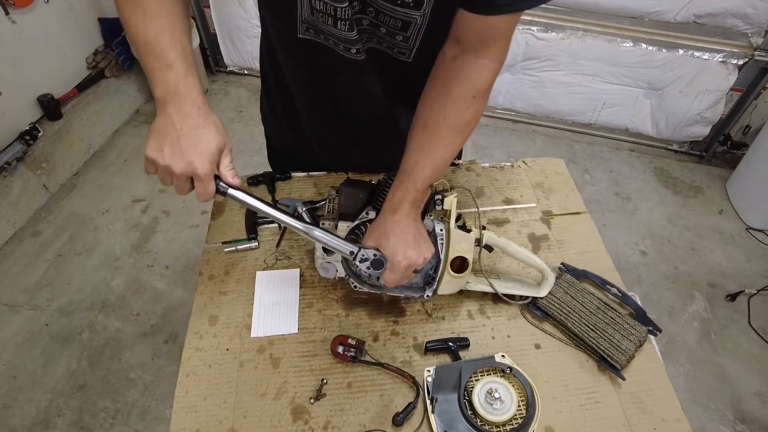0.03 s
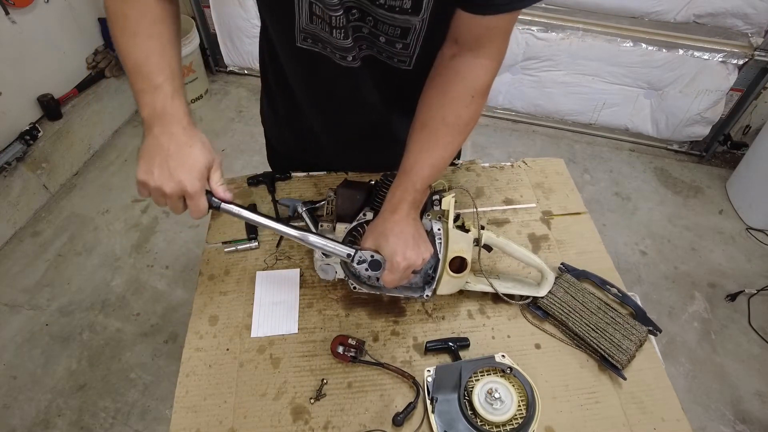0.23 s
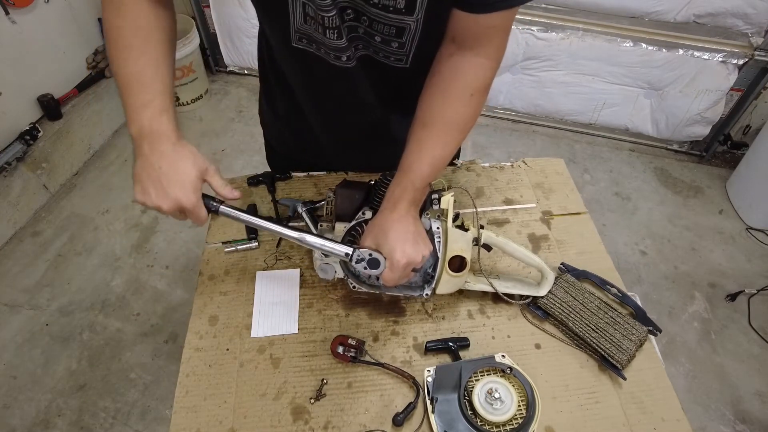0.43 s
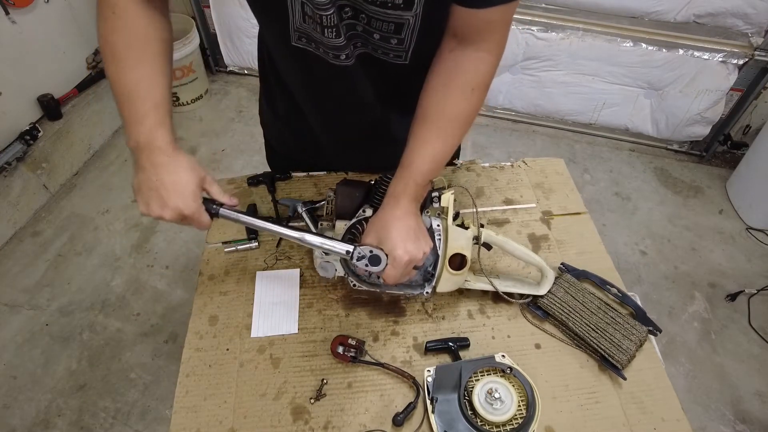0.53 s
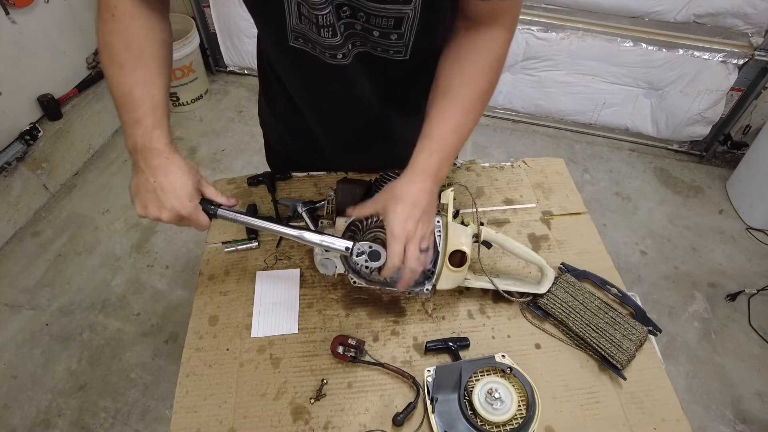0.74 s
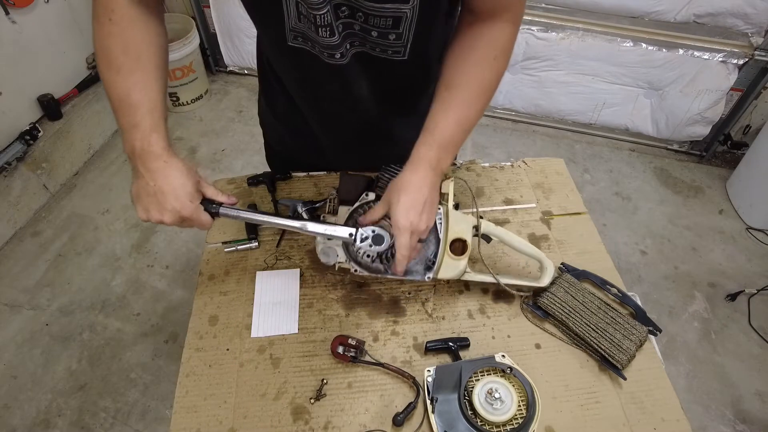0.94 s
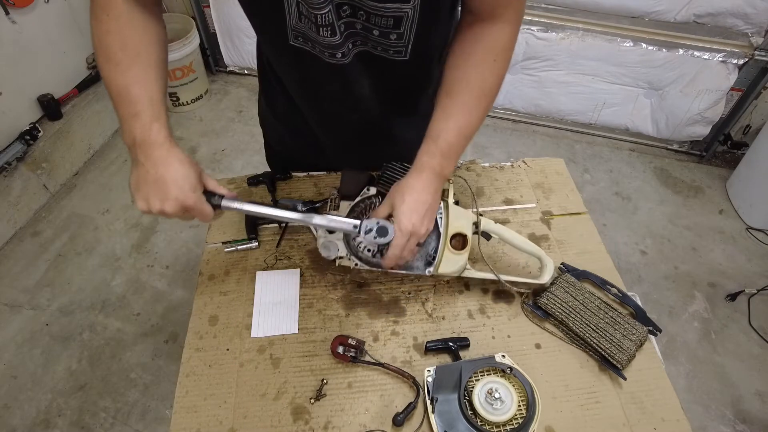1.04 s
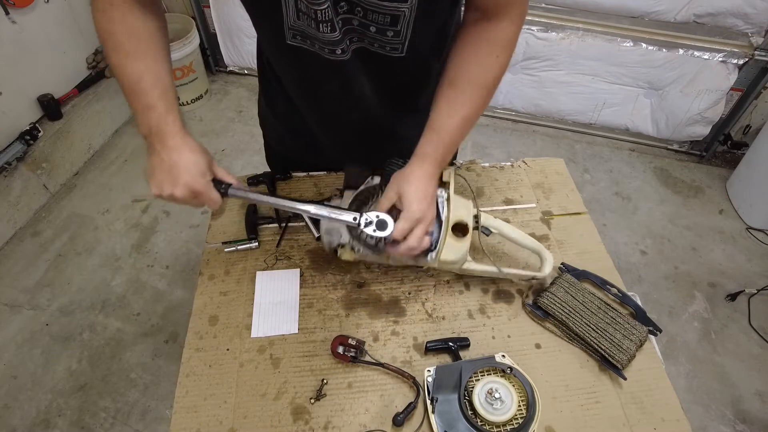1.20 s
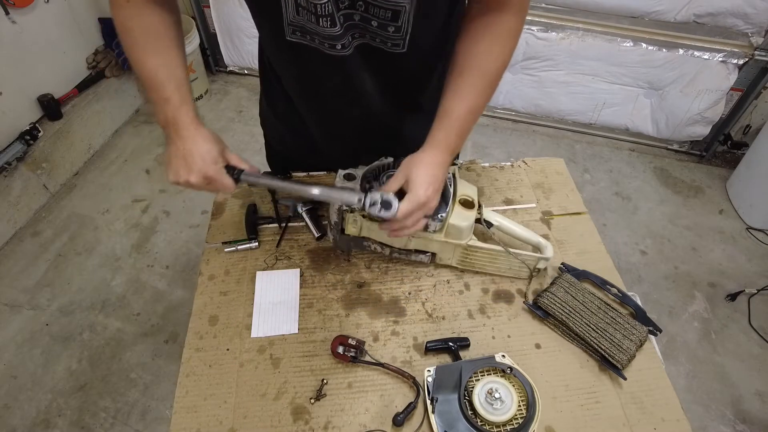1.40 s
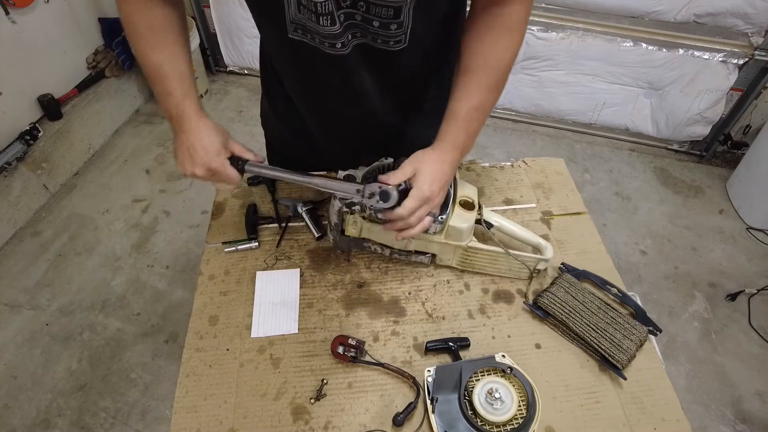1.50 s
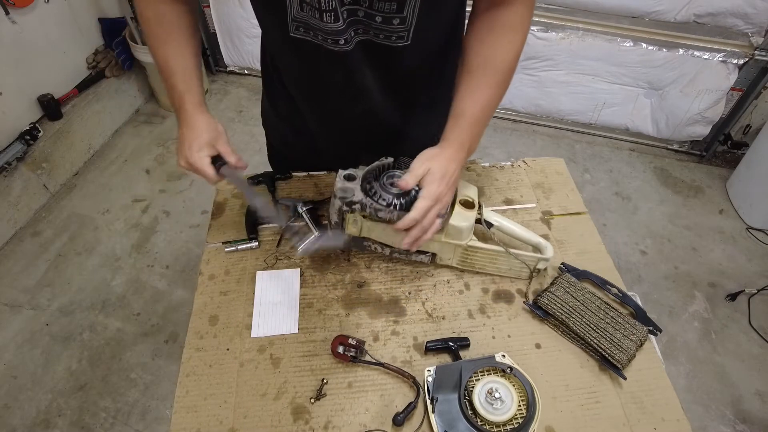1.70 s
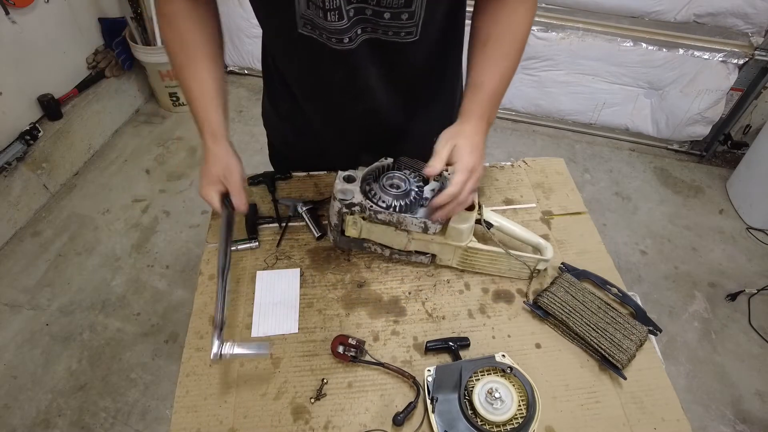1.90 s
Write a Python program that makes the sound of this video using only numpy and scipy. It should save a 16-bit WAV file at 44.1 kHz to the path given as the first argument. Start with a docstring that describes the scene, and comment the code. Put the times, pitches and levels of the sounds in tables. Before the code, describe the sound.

A torque wrench snaps once, sharp and metallic, on a chainsaw's nut. Faint ratchet ticks, hand bumps and a socket clink follow, then the saw's housing knocks down hard. The garage adds a short, bright echo over low hum.

```python
"""At a garage workbench, a click-type torque wrench breaks over on a chainsaw's clutch nut.
The impact excites the damped modes of the wrench's tube and jolts the engine. Hands squeak, bump and
rub, the ratchet clicks and the socket clinks as it is worked off the nut; then the saw's housing
knocks down sharply. Each struck body rings at its natural frequencies, and a short, bright
reverberation follows, over low rumble and hum."""
import sys
import numpy as np
from scipy import signal
from scipy.fft import rfft, irfft, next_fast_len
from scipy.io import wavfile
from scipy.ndimage import uniform_filter1d

SR = 44100
rng = np.random.default_rng(int(sys.argv[2]) if len(sys.argv) > 2 else 0)


def put_to_file(sound):
    """Save the sound as 16-bit audio at rate SR, in the file named by the first command-line argument."""
    columns = np.atleast_2d(sound).T  # one column per channel
    safe = np.clip(columns, -1, 1)
    whole_steps = np.round(safe * 32767)
    wavfile.write(sys.argv[1], SR, whole_steps.astype(np.int16))


N = 85995
TIME_S = np.arange(N) / SR


def amp(db):
    """Amplitude ratio of a level in decibels."""
    return 10 ** (np.asarray(db) / 20)


def unit_rms(x):
    """Normalisation to an rms of 1."""
    return x / np.sqrt(np.mean(x ** 2))


def decay(t60_s):
    """Exponential damping: 60 dB down after t60_s."""
    return np.exp(-np.log(1000) * TIME_S / t60_s)


def along(curve, hz):
    """Interpolation of (frequency, value) points on a logarithmic frequency axis."""
    knots_hz, values = np.array(curve).T
    return np.interp(np.log(np.maximum(hz, 1)), np.log(knots_hz), values)


def colour(x, spectrum):
    """Minimum-phase filtering: folding the cepstrum makes the given response causal."""
    size = 2 * next_fast_len(N)
    hz = np.arange(size // 2 + 1) * SR / size
    cepstrum = irfft(np.log(amp(along(spectrum, hz))))
    cepstrum[1:size // 2] *= 2
    cepstrum[size // 2 + 1:] = 0
    return irfft(rfft(x, size) * np.exp(rfft(cepstrum)))[..., :N]


def transpose(table, ratio):
    """Transposition: all frequencies scale by one ratio."""
    return [(hz * ratio, *rest) for hz, *rest in table]


def place(x, pan_db, lag_s=2.5e-5):
    """Level and time differences locate a source: the left channel is louder and earlier."""
    hz = np.arange(N + 1) * SR / (2 * N)
    late = irfft(rfft(x, 2 * N) * np.exp(-2j * np.pi * hz * lag_s))[:N]
    return np.array([x * amp(pan_db / 2), late * amp(-pan_db / 2)])


def contact_force(start_s, level_db, contact_ms=0.02):
    """A Gaussian force pulse: the longer the contact, the narrower the bandwidth and the duller the blow."""
    ms = (np.arange(N) - round(start_s * SR)) * 1000 / SR
    force = np.exp(-np.minimum((2 * ms / contact_ms) ** 2, 60))
    return amp(level_db) * force / force.sum()


# Contact noise spectrum: frequency_hz, gain_db
CRACK_SPECTRUM = [(300, -11.5), (1300, -2.5), (2300, -7), (4900, -3.5), (6100, -7.5), (8000, -14),
                  (12000, -13.5), (16000, -22)]

def strike(blows, modes, crack_db, crack_t60_s, low_hz, rise_s):
    """Modal superposition: each blow excites modes and noise; small bodies radiate little below low_hz."""
    ringing = sum(amp(db) * decay(t60_s) * np.sin(2 * np.pi * hz * TIME_S) for hz, db, t60_s in modes)
    onset = 1 - np.exp(-TIME_S / rise_s)
    sound = 0
    for blow in blows:
        crack = amp(crack_db) * colour(rng.standard_normal(N) * decay(crack_t60_s), CRACK_SPECTRUM)
        sound += signal.fftconvolve(contact_force(*blow), (ringing + crack) * onset)[:N]
    return signal.sosfilt(signal.butter(2, low_hz, "high", fs=SR, output="sos"), sound)


# Rumble spectrum: frequency_hz, gain_db
RUMBLE_SPECTRUM = [(30, 0), (55, -9.5), (110, -12.5), (200, -11.5), (320, -22), (700, -33.5), (1500, -39.5),
                   (2500, -45), (6000, -48.5), (9000, -56), (16000, -59)]
# Steady hum tones: pitch_hz, level_db
HUM_TONES = [(31.5, -61), (95.5, -61.5), (120, -67.5), (167, -68), (189, -62), (247, -75.5)]
# Hiss spectrum: frequency_hz, gain_db
HISS_SPECTRUM = [(300, -20.5), (1200, 2.5), (2500, -5), (4500, 1), (8000, -7), (16000, -29.5)]

def background():
    """Ambient rumble and hum, coherent between the ears in the bass; a faint hiss and steel ring decay."""
    rumble, side = amp(-51) * unit_rms(colour(rng.standard_normal((2, N)), RUMBLE_SPECTRUM))
    side = colour(side, [(60, -21), (180, -10), (500, -1.5), (4000, -4)])
    hum = sum(np.sqrt(2) * amp(db) * np.sin(2 * np.pi * (hz * TIME_S + rng.random()))
              for hz, db in HUM_TONES)
    hiss = amp(-61.5) * decay(t60_s=0.92) * unit_rms(colour(rng.standard_normal((2, N)), HISS_SPECTRUM))
    steel = amp(-69.5) * decay(t60_s=1) * np.sin(2 * np.pi * 6285 * TIME_S)
    return place(rumble + hum + steel, pan_db=1.9) + np.array([side, -side]) + hiss


# The pivot slips, then hits the tube wall: start_s, level_db, pitch_ratio
WRENCH_SNAPS = [(0.2061, -0.5, 1.08), (0.2082, 1, 1)]
# Modes of the wrench's tube and head: pitch_hz, level_db, t60_s
WRENCH_MODES = [(1236, -14, 0.0073), (3025, -25.5, 0.035), (3638, -21, 0.018), (4400, -20.5, .008),
                (4670, -3, 0.0058), (4840, -30.5, 0.027), (5540, -24, 0.011), (7350, -33.5, 0.025)]

def wrench_snap():
    """Impact excitation: two contacts ring the steel tube, the first a little higher."""
    snap = sum(strike([(start_s, db)], transpose(WRENCH_MODES, ratio),
                      crack_db=-16.5, crack_t60_s=0.054, low_hz=655, rise_s=0.00021)
               for start_s, db, ratio in WRENCH_SNAPS)
    return place(snap, pan_db=0.5)


# The engine is jolted and rocks back once: start_s, level_db
ENGINE_JOLTS = [(0.2079, 1.5), (0.2171, -6.5)]
# Engine block modes: pitch_hz, level_db, t60_s
ENGINE_MODES = [(132, -40.5, 0.14), (265, -38, 0.23), (328, -46.5, 0.12), (430, -40, .16),
                (884.5, -21.5, 0.05), (995.4, -23.5, 0.052), (1128, -20.5, 0.025), (1418, -32.5, .05)]

def engine_jolt():
    """Structure-borne sound: the sudden release passes through the nut and rings the block."""
    jolt = strike(ENGINE_JOLTS, ENGINE_MODES, crack_db=-34, crack_t60_s=0.013, low_hz=108, rise_s=8e-5)
    return place(jolt, pan_db=2)


# Squeak of the grip: start_s, length_s, from_hz, to_hz, level_db
GRIP_SQUEAK = (0.523, 0.042, 1350, 1000, -57)

def grip_squeak():
    """Stick-slip friction: skin on the cover gives an unsteady tone that falls as the grip eases."""
    start_s, length_s, from_hz, to_hz, db = GRIP_SQUEAK
    progress = np.clip((TIME_S - start_s) / length_s, 0, 1)
    hz = from_hz * (to_hz / from_hz) ** np.sqrt(progress)
    flutter = unit_rms(uniform_filter1d(rng.standard_normal(N), size=200))
    envelope = amp(db) * np.sin(np.pi * progress) * (1 + 0.5 * flutter)
    return place(envelope * np.sin(2 * np.pi * np.cumsum(hz) / SR), pan_db=1.5)


# Hands and tool meet the cover: start_s, level_db, contact_ms, pitch_ratio
COVER_BUMPS = [(0.602, -18, 0.13, 1.35), (0.925, -11, 0.19, 1.3), (1.131, -8.5, 0.21, 0.37),
               (1.1735, -0.5, 0.37, 0.99), (1.2113, -6.5, 0.36, 1.15), (1.231, 5.5, 0.35, 1),
               (1.2645, -2.5, .4, 0.92), (1.274, -3.5, 0.081, 1.1)]
# Plastic cover modes: pitch_hz, level_db, t60_s
COVER_MODES = [(410, -59.5, 0.064), (720, -40, 0.075), (954, -34, 0.025), (1150, -38, 0.041),
               (1280, -47.5, 0.035), (1653, -53, 0.0053), (2180, -38, 0.013)]

def cover_bumps():
    """Soft contact excites mainly low modes: dull bumps whose pitch depends on the spot struck."""
    bumps = sum(strike([(start_s, db, contact_ms)], transpose(COVER_MODES, ratio),
                       crack_db=-33.5, crack_t60_s=0.13, low_hz=342, rise_s=0.00017)
                for start_s, db, contact_ms, ratio in COVER_BUMPS)
    return place(bumps, pan_db=1.5)


# Light tinks of the ratchet head: start_s, level_db, pitch_ratio, t60_ratio
PAWL_TINKS = [(0.636, 1.5, 1.31, .25), (0.708, 3.5, 1.02, 1), (0.975, -4.5, 1.95, .15),
              (1.082, 2, 1.3, .15)]
# Ratchet pawl modes: pitch_hz, level_db, t60_s
PAWL_MODES = [(4520, -58, 0.13), (4940, -72, 0.3), (5560, -68.5, 0.51), (5780, -71.5, 0.35),
              (7300, -63.5, 0.047)]

def pawl_tinks():
    """Damped free vibration: the ratchet tinks as it is let go, and fingers shorten the ring."""
    tinks = 0
    for start_s, level_db, pitch_ratio, t60_ratio in PAWL_TINKS:
        modes = [(hz * pitch_ratio, db, t60_s * t60_ratio) for hz, db, t60_s in PAWL_MODES]
        tinks += strike([(start_s, level_db)], modes,
                        crack_db=-50.5, crack_t60_s=0.08, low_hz=4930, rise_s=0.002)
    return place(tinks, pan_db=0.4)


# Socket and hands slide: start_s, peak_s, end_s, level_db, pitch_ratio
RUB_STROKES = [(0.763, 0.946, 0.95, -72, 2.8), (1.036, 1.077, 1.14, -61.5, 2.1),
               (1.164, 1.233, 1.315, -43, 0.9), (1.842, 1.943, 1.96, -67.5, 1.4)]
# Friction noise spectrum: frequency_hz, gain_db
RUB_SPECTRUM = [(200, -27), (480, -13), (700, 2.5), (1100, 5), (1450, -5.5), (2600, -9), (6000, -19),
                (8000, -29), (16000, -32.5)]

def rubbing(grains_per_s=1200):
    """Sliding friction: tiny random impulses merge into a grainy noise that swells with pressure."""
    rubs = 0
    for start_s, peak_s, end_s, db, ratio in RUB_STROKES:
        grains = rng.standard_normal(N) * (rng.random(N) < grains_per_s / SR)
        pressure = np.interp(TIME_S, [start_s, peak_s, end_s], [0, 1, 0])
        rubs += amp(db) * pressure * unit_rms(colour(grains, transpose(RUB_SPECTRUM, ratio)))
    return place(rubs, pan_db=1.5)


# The housing is nudged, then lands on one edge and falls flat: start_s, level_db, contact_ms
HOUSING_KNOCKS = [(1.054, -26, 0.37), (1.3734, -7.5, 0.031), (1.3743, 1.5, 0.03)]
# Saw housing modes: pitch_hz, level_db, t60_s
HOUSING_MODES = [(645.6, -27, 0.12), (1003, -27.5, 0.16), (1190, -31, 0.058), (1433, -15.5, 0.016),
                 (1665, -12.5, 0.016), (1972, -16.5, 0.019), (2873, -15, 0.029), (3135, -19, 0.018),
                 (3412, -19.5, 0.019), (3900, -31.5, 0.037), (5106, -12, 0.0079), (6440, -24, 0.0098)]

def housing_knock(gap_hz=2365, gap_width_hz=140):
    """Hard contact excites a wide band: a clack, hollowed by a gap where the housing hardly radiates."""
    clack = strike(HOUSING_KNOCKS, HOUSING_MODES,
                   crack_db=-14.5, crack_t60_s=0.05, low_hz=756, rise_s=7.9e-5)
    notch = signal.iirnotch(gap_hz, gap_hz / gap_width_hz, fs=SR)
    return place(signal.lfilter(*notch, clack), pan_db=1)


# Double click of the ratchet gear: start_s, level_db
GEAR_CLICKS = [(1.1942, 0.5), (1.1965, 7)]
# Ratchet gear modes: pitch_hz, level_db, t60_s
GEAR_MODES = [(2550, -35.5, .012), (4770, -61.5, 0.51), (5320, -35.5, 0.014), (5950, -35.5, 0.0074),
              (6550, -50.5, .012), (12000, -38.5, .003)]

def gear_clicks():
    """Backlash: the gear takes up its play in two crisp impacts."""
    clicks = strike(GEAR_CLICKS, GEAR_MODES, crack_db=-38, crack_t60_s=0.034, low_hz=895, rise_s=0.0012)
    return place(clicks, pan_db=0.4)


# The socket strikes the nut: start_s, level_db
SOCKET_CLINKS = [(1.23, 6), (1.2328, -16.5)]
# Modes of the steel socket and clutch: pitch_hz, level_db, t60_s
SOCKET_MODES = [(2524, -32.5, 0.027), (2885, -28.5, 0.016), (3583, -35.5, 0.049), (5071, -49.5, 0.36),
                (5475, -52, 0.2), (8866, -62, 0.096), (9000, -61, 0.027), (10520, -54.5, 0.1),
                (15250, -51, .04)]

def socket_clinks():
    """Lightly damped resonance: the loose socket clinks and rings on."""
    clinks = strike(SOCKET_CLINKS, SOCKET_MODES,
                    crack_db=-30, crack_t60_s=0.034, low_hz=895, rise_s=0.0012)
    return place(clinks, pan_db=0.4)


# Left-right difference of a field that is diffuse except in the bass: frequency_hz, gain_db
SIDE_SPECTRUM = [(150, -8), (700, 0)]
# Reverberation time by band: centre_hz, t60_s
ROOM_DECAY = [(150, 0.37), (600, 0.34), (1500, 0.47), (5000, 0.5), (9000, 0.45), (15000, 0.16)]
# Colour of the reflections: frequency_hz, gain_db
ROOM_SPECTRUM = [(100, -4.5), (400, 10), (900, -3), (1600, 1), (3000, -0.5), (5000, -3), (8000, 3),
                 (15000, 10)]

def garage_reverb(source, level_db=-6, gap_s=0.0017, build_s=0.0049):
    """Reverberation: dense reflections from concrete and walls, dying soonest in the highest treble."""
    mid, side = rng.standard_normal((2, N))
    side = colour(side, SIDE_SPECTRUM)
    noise_spectra = rfft(np.array([mid + side, mid - side]))
    hz = np.arange(noise_spectra.shape[1]) * SR / N
    tail = 0
    for centre_hz, t60_s in ROOM_DECAY:
        band = along([(knot_hz, float(knot_hz == centre_hz)) for knot_hz, _ in ROOM_DECAY], hz)
        tail += irfft(noise_spectra * band, N) * decay(t60_s)
    tail *= 1 - np.exp(-np.maximum(TIME_S - gap_s, 0) / build_s)
    tail = colour(unit_rms(tail) / np.sqrt(N), ROOM_SPECTRUM)
    return amp(level_db) * np.array([signal.fftconvolve(source, ear)[:N] for ear in tail])


def scene():
    """Superposition of the background, the direct sound of tools and saw, and its reflections."""
    ambience = background()
    direct = wrench_snap() + engine_jolt() + grip_squeak() + cover_bumps() + pawl_tinks()
    direct += rubbing() + housing_knock() + gear_clicks() + socket_clinks()
    return ambience + direct + garage_reverb(direct.mean(axis=0))


def record(dry, ceiling_db=1.5, top_hz=16000):
    """Soft saturation rounds the loudest peaks; a steep low-pass limits the bandwidth."""
    rounded = amp(ceiling_db) * np.tanh(dry / amp(ceiling_db))
    return signal.sosfilt(signal.ellip(8, 0.2, 70, top_hz, fs=SR, output="sos"), rounded)


dry = scene()
out = record(dry)
put_to_file(out)
```